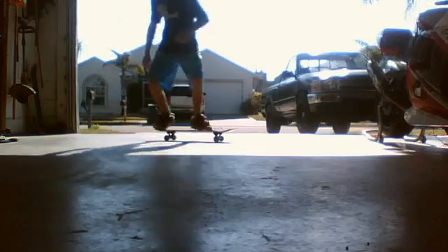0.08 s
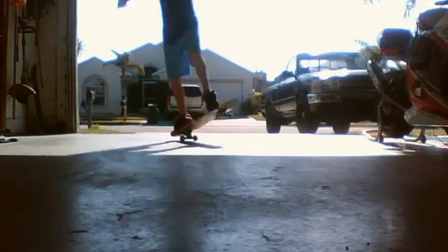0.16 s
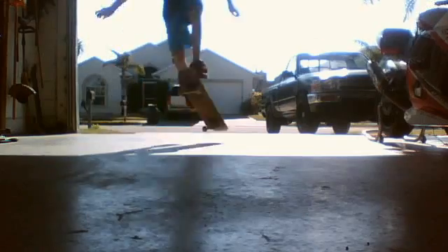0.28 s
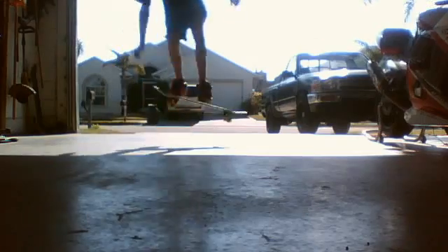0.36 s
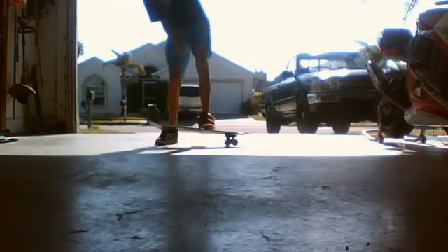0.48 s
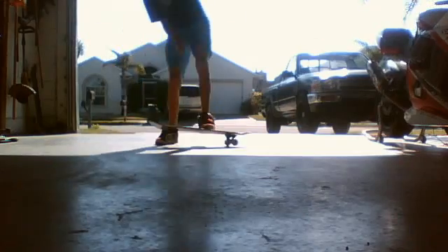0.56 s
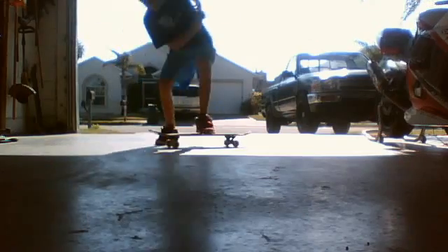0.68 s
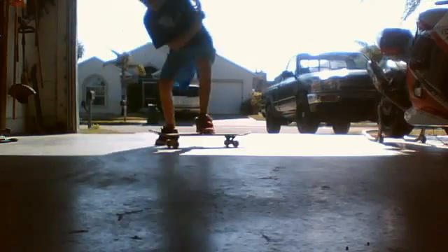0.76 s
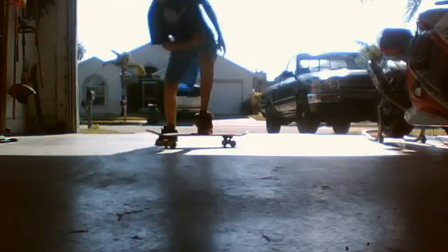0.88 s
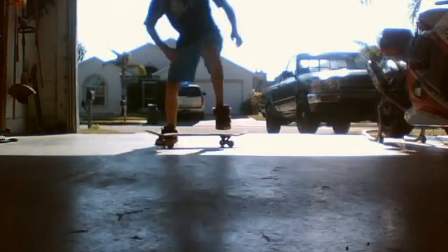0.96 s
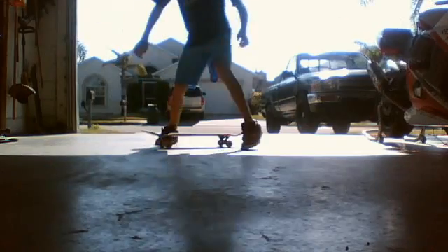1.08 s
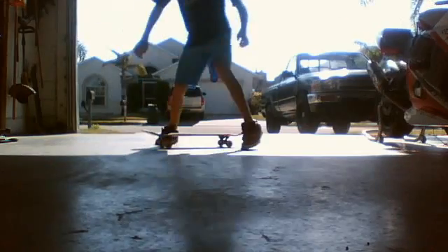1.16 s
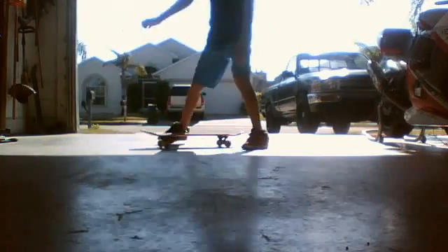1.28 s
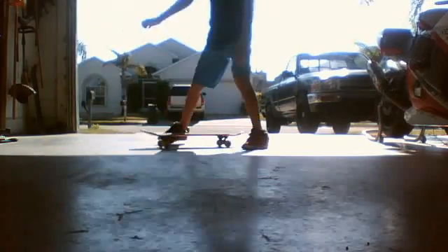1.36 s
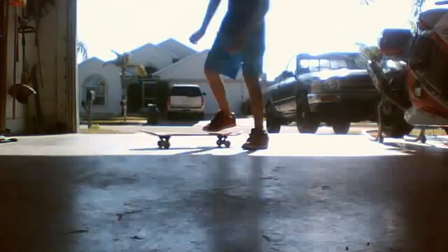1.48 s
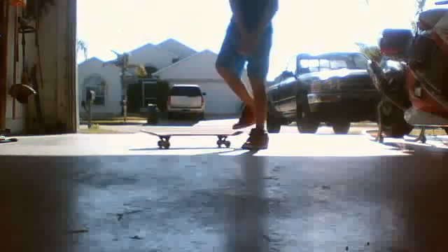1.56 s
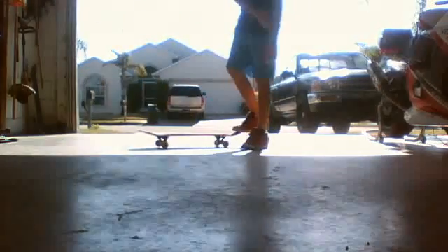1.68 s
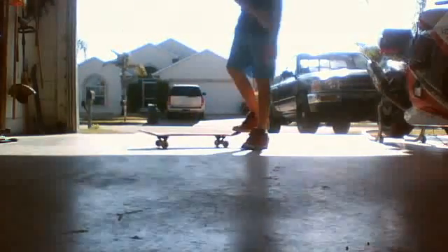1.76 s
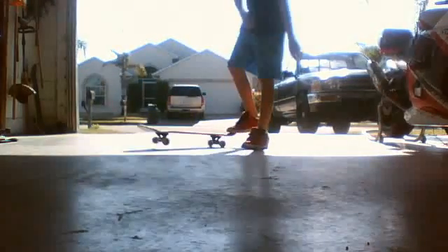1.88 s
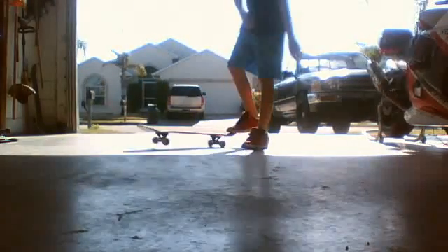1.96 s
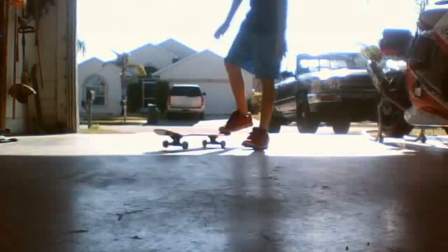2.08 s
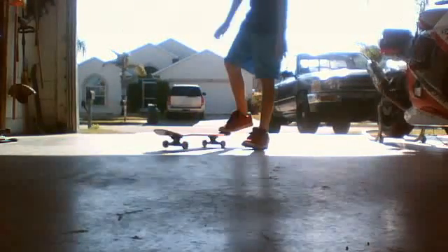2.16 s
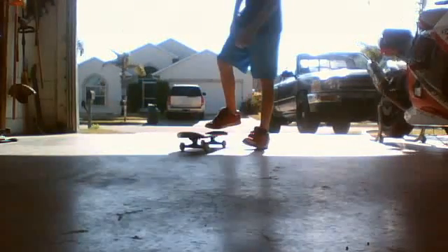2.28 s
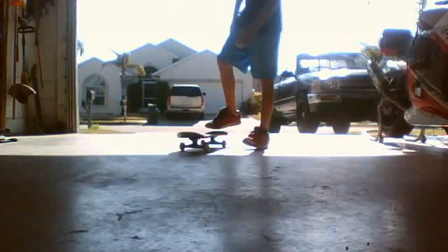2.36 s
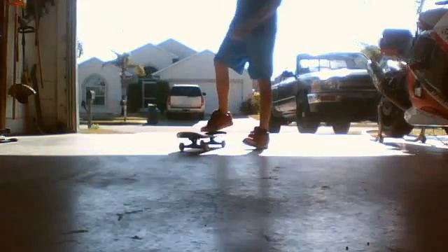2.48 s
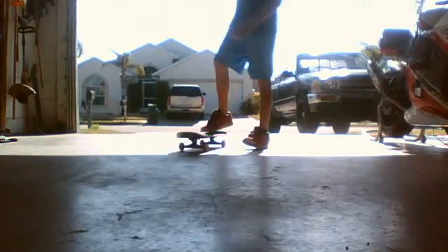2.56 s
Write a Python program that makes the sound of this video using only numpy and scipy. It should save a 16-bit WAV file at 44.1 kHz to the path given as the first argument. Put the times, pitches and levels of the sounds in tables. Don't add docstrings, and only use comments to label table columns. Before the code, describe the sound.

Close to the floor of a bare concrete garage, a small overloading microphone picks up a skateboard's pop and heavy clattering landing, long reverberation, light knocks, a low tyre-drag stutter, then a final quick clack over faint street noise.

```python
import sys
import numpy as np
from scipy import signal
from scipy.io import wavfile
from scipy.ndimage import uniform_filter1d

SR = 44100
rng = np.random.default_rng(int(sys.argv[2]) if len(sys.argv) > 2 else 0)


def rack_gain(trim_db):
    fader = np.asarray(trim_db, float)
    return 10 ** (fader / 20)


def inscribe(sig):
    pcm = np.round(np.clip(np.atleast_2d(sig).T, -1, 1) * 32767)
    wavfile.write(sys.argv[1], SR, pcm.astype(np.int16))


N = 114660

# mode in Hz, level in dB, 60 dB decay in seconds.
DRAG_MODES = [(444, 6.5, 0.049), (378, -18.5, 0.075), (590, -0.5, 0.045), (670, -7, 0.036),
              (900, -13, 0.013), (1180, -34, 0.011), (1720, 2.5, 0.035)]


def unit(x):
    return x / np.sqrt(np.mean(x ** 2))


def noise(shape=N):
    return rng.standard_normal(shape)


def band(x, hz, width_hz):
    return signal.lfilter(*signal.iirpeak(hz, hz / width_hz, fs=SR), x)


def band_twice(x, hz, width_hz):
    return band(band(x, hz, width_hz), hz, width_hz)


def filtered(x, design):
    return signal.sosfilt(design, x)


def fade(t, t60):
    return np.exp(-np.log(1000) * t / t60)


def ring(modes, seconds, scatter_db=0., detune=0.):
    t = np.arange(int(seconds * SR)) / SR
    out = np.zeros(len(t))
    for hz, db, t60 in modes:
        gain = rack_gain(db + scatter_db * rng.standard_normal())
        pitch = hz * (1 + detune * rng.standard_normal())
        out += gain * fade(t, t60) * np.sin(2 * np.pi * pitch * t)
    return out


def add(track, s, x):
    i = int(s * SR)
    track[i:i + len(x)] += x[:N - i]


def walk(rate):
    k = int(SR / rate)
    return unit(uniform_filter1d(uniform_filter1d(noise(), k), k))


def push(x, contact_s):
    t = (np.arange(256) + .5) / SR
    force = np.sin(np.pi * np.clip(t / contact_s, 0, 1))
    return np.convolve(x, force / (contact_s * SR * 2 / np.pi))[:len(x)]


def blows():
    # start in seconds, level in dB, contact in ms, crack in dB, loudest ring in Hz.
    hits = [(.219, -13, 0.29, -27, 930), (.231, 4, 0.53, -7, 801), (.262, 0, 0.61, -35, 380),
            (.3, -31, 1, -9, 420), (0.441, 6.5, 0.82, -17, 354), (0.464, -3, 0.94, -7, 302),
            (.502, 17, 0.43, -22.5, 555), (.545, 9.5, 1.43, -6, 296), (.592, 8, 0.43, -12, 810),
            (.632, -10, 0.23, -2.5, 499), (1.122, -25.5, 0.58, -15.5, 446),
            (1.195, -13.5, 0.62, -20.5, 550), (1.203, -17, 1.3, -11.5, 300),
            (1.214, -28, 0.11, -23.5, 2640), (1.244, -29, 0.12, -20, 3050), (1.645, -32, 0.34, -7.5, 2200),
            (1.655, -29, 0.23, -8.5, 1240), (1.964, -31, 1.6, -24, 240), (2.108, -21.5, 0.3, -11.5, 700),
            (2.116, -13.5, 0.6, 0, 2440), (2.122, -1, 0.26, -10.5, 696), (2.136, -6, 0.13, -11.5, 1624),
            (2.152, -4, 0.78, -5.5, 684), (2.18, -9.5, 0.36, -9, 343)]
    # mode in Hz, level in dB, 60 dB decay in seconds.
    deck = [(329.7, 5.5, 0.035), (455, -3.5, .03), (586, -24, 0.02), (645, -10.5, 0.065),
            (743.4, 1.5, 0.033), (963, -4, 0.067), (1134, -1, 0.071), (1254, -40.5, 0.05),
            (1500, -10.5, 0.075), (1950, -41, .015), (2433, -11, 0.035), (2810, -9, .015),
            (3200, -18, 0.0059)]
    ring_db, ring_t60_s = -1.5, 0.024
    crack_hz, crack_width_hz, crack_t60_s = 1516, 1250, 0.038
    grit_share, rise_contacts = 0.24, 7.5
    out = np.zeros(N)
    for s, db, contact_ms, crack_db, ring_hz in hits:
        contact_s = contact_ms / 1000
        body = ring(deck, .2, scatter_db=1.5, detune=.015) / 3
        body = body + ring([(ring_hz, ring_db, ring_t60_s)], .2)
        t = np.arange(len(body)) / SR
        grit = push(band(noise(len(t)), crack_hz, crack_width_hz), grit_share * contact_s)
        rise = 1 - np.exp(-t / (rise_contacts * contact_s))
        crack = 3 * unit(grit) * fade(t, crack_t60_s) * rise
        add(out, s, rack_gain(db) * (push(body, contact_s) + rack_gain(crack_db) * crack))
    return out


def skids():
    # end in seconds, level in dB, 60 dB swell in seconds, centre in Hz.
    swells = [
        (.231, -7.5, 0.051, 800),
        (0.44, -18, 0.056, 500),
        (2.122, -16, 0.041, 700),
    ]
    t = np.arange(SR // 10) / SR
    out = np.zeros(N)
    for end, db, swell_s, hz in swells:
        scrape = unit(band(noise(len(t)), hz, 0.67 * hz))
        add(out, end - len(t) / SR, rack_gain(db) * scrape * fade(t, swell_s)[::-1])
    return out


def board_hits():
    return filtered(blows() + skids(), signal.butter(2, 192, "high", fs=SR, output="sos"))


def wheels(t):
    # time in seconds, level in dB.
    roll = [
        (0.0, -26.5),
        (0.012, -38.5),
        (0.102, -28),
        (0.176, -30),
        (0.194, -30.5),
        (0.21, -17),
    ]
    # centre in Hz, width in Hz, level in dB.
    resonances = [(200.5, 153, -0.5), (380, 113, -1.5), (796, 100, -1.5), (980, 430, -5.5),
                  (1730, 300, -15.5), (3950, 1900, -20.5)]
    grains = rack_gain(2.1 * rng.exponential(size=N))
    grit = noise() * grains * rack_gain(1.2 * walk(42))
    rumble = np.zeros(N)
    for hz, width_hz, db in resonances:
        rumble += rack_gain(db) * unit(band_twice(grit, hz, width_hz))
    s, level_db = np.array(roll).T
    return unit(rumble) * rack_gain(np.interp(t, s, level_db, right=-120))


def rubber_grip():
    samples = 36
    return np.hanning(samples) * 2 / samples


def drag(t):
    # time in seconds, judder in dB, slips per second, scuff in dB.
    path = [
        (1.634, -44, 140, -62),
        (1.65, -34.5, 146.6, -66),
        (1.69, -28, 120, -47),
        (1.716, -41.5, 120, -44.5),
        (1.775, -30, 87, -44),
        (1.83, -38, 60, -51),
        (1.872, -69, 52, -52),
        (1.95, -55, 71, -70),
    ]
    s, judder_db, slip_rate, scuff_db = np.array(path).T
    jitter, scatter_db, scuff_hz = .4, 3.5, 3300
    phase = np.cumsum(np.interp(t, s, slip_rate) * np.exp(jitter * walk(47))) / SR
    slips = np.diff(np.floor(phase), prepend=0) * rack_gain(scatter_db * noise())
    slip_sound = np.convolve(ring(DRAG_MODES, .1), rubber_grip())
    judder = unit(signal.fftconvolve(slips, slip_sound)[:N])
    scuff = unit(band(band(noise(), scuff_hz, 4500), scuff_hz, 5500)) * rack_gain(1.3 * walk(60))
    judder_gain = rack_gain(np.interp(t, s, judder_db, left=-120, right=-120))
    scuff_gain = rack_gain(np.interp(t, s, scuff_db, left=-120, right=-120))
    return judder * judder_gain + scuff * scuff_gain


def rubber_grabs():
    # start in seconds, level in dB.
    grabs = [(1.673, -37.5), (1.695, -32), (1.71, -26), (1.732, -23), (1.742, -29.5), (1.754, -46),
             (1.775, -28), (1.796, -31.5), (1.81, -44), (1.822, -47.5), (1.833, -35), (1.85, -44.5),
             (1.873, -51.5), (1.899, -46)]
    out = np.zeros(N)
    for s, db in grabs:
        grab = np.convolve(ring(DRAG_MODES, .1, scatter_db=1.5, detune=0.01), rubber_grip())
        add(out, s, rack_gain(db) * grab)
    return out


def ticks():
    # start in seconds, level in dB.
    clicks = [(0.0034, -36), (0.0114, -40), (0.0867, -46), (0.1326, -35), (0.9393, -41), (1.0194, -48),
              (1.0829, -37), (1.1732, -37), (1.3773, -38), (1.3942, -39), (1.4331, -45), (1.5324, -37),
              (1.6691, -35), (1.7619, -38), (1.8248, -37), (1.9664, -36), (1.9924, -45), (2.4119, -37),
              (2.4563, -42), (2.578, -35)]
    # mode in Hz, level in dB, 60 dB decay in seconds.
    part_modes = [(3080, 6.5, 0.012), (5200, 2, 0.007), (6680, -3, 0.022), (240, -3, 0.021),
                  (800, 3.5, 0.011)]
    attack_s = 0.00052
    out = np.zeros(N)
    for s, db in clicks:
        click = ring(part_modes, .05, detune=.011)
        attack = np.minimum(np.arange(len(click)) / (attack_s * SR), 1)
        add(out, s, rack_gain(db) * click * attack)
    return out


def garage(x):
    # band centre in Hz, 60 dB decay in seconds, level in dB.
    room_bands = [(129.6, 1, -4.5), (240, 0.81, -10), (414, 0.67, 5), (700, 0.64, 12), (1296, 0.63, 8.5),
                  (1900, 0.66, 5), (3500, 0.65, 1), (6000, 0.7, -3.5), (10100, 0.88, -18.5)]
    band_ratio = 1.31
    first_wall_s, build_s = 0.0038, 0.0018
    early_db, early_t60_s = -4, 0.35
    t = np.arange(SR) / SR
    tail = np.zeros(SR)
    for hz, t60, db in room_bands:
        edges = signal.butter(2, [hz / band_ratio, hz * band_ratio], "band", fs=SR, output="sos")
        tail += rack_gain(db) * filtered(noise(SR), edges) * fade(t, t60)
    build_up = 1 - np.exp(-np.maximum(t - first_wall_s, 0) / build_s)
    tail = tail * build_up * (1 + rack_gain(early_db) * fade(t, early_t60_s))
    return signal.fftconvolve(x, tail / np.sqrt(np.sum(tail ** 2)))[:N]


def air():
    # frequency in Hz, level in dB per Hz.
    spectrum = [(65, -35), (110, 6), (686, -10.5), (848, -11), (952, -2.5), (3080, -11.5), (3670, -12),
                (7060, -16), (11000, -29), (14300, -68), (22000, -120)]
    hz, db = np.array(spectrum).T
    out = np.zeros(N)
    for centre in 120 * 2 ** np.arange(0, 6.6, .5):
        level_db = np.interp(np.log(centre), np.log(hz), db) + .6 * walk(7.7)
        out += rack_gain(level_db) * band_twice(noise(), centre, centre / 2)
    return unit(out) * rack_gain(-46.5)


def hum(t):
    return np.sin(2 * np.pi * 127.4 * t) * rack_gain(-58.5 + 0.83 * walk(6))


def scene():
    t = np.arange(N) / SR
    hits = board_hits()
    small = ticks()
    rubber = drag(t) + rubber_grabs()
    wet = garage(rack_gain(-4) * hits + rack_gain(-16) * small + rack_gain(-11.5) * rubber)
    return (hits + small + rubber + wet + wheels(t) + air() + hum(t))[None]


def band_limit(x):
    return signal.sosfilt(signal.butter(12, 15770, fs=SR, output="sos"), x)


def record(dry):
    ceiling, knee = .72, 63
    x = filtered(dry, signal.cheby2(6, 34, 95.5, "high", fs=SR, output="sos"))
    x = filtered(x, signal.butter(3, 8200, fs=SR, output="sos"))
    x = x / (1 + np.abs(x / ceiling) ** knee) ** (1 / knee)
    x = x + rack_gain(-70) * unit(band(noise(x.shape), 45, 90))
    x = filtered(x, signal.butter(1, 6940, fs=SR, output="sos"))
    x = filtered(x, signal.ellip(8, .1, 60, 15700, fs=SR, output="sos"))
    return band_limit(x)


dry = scene()
out = record(dry)
inscribe(out)
```